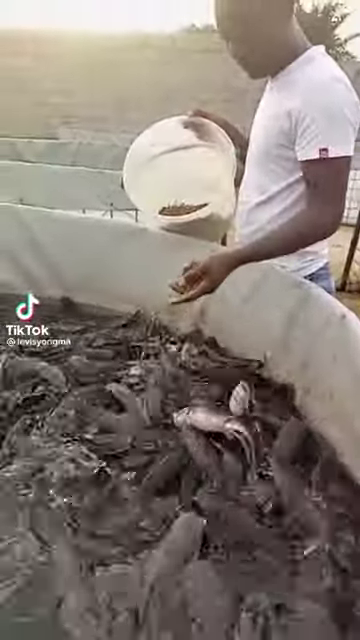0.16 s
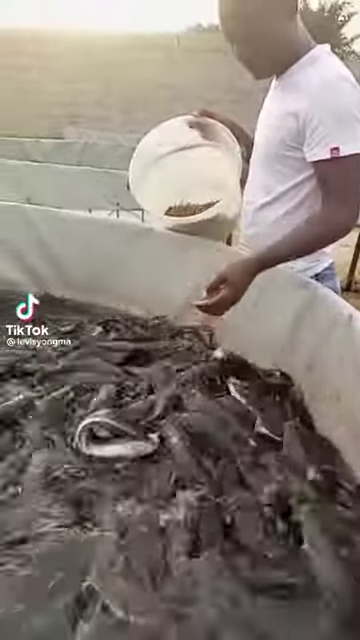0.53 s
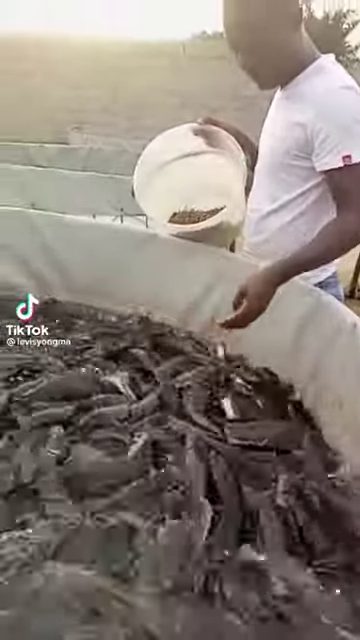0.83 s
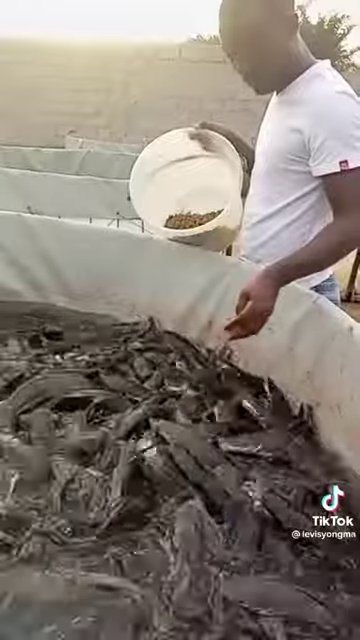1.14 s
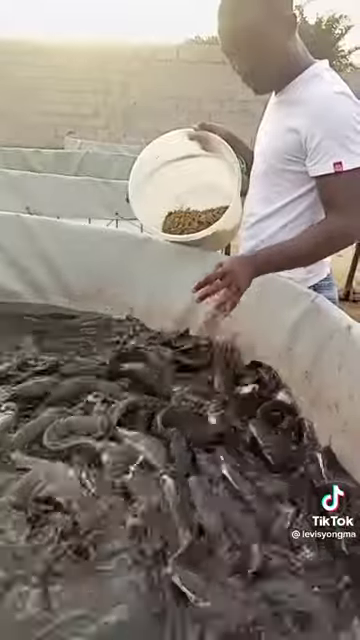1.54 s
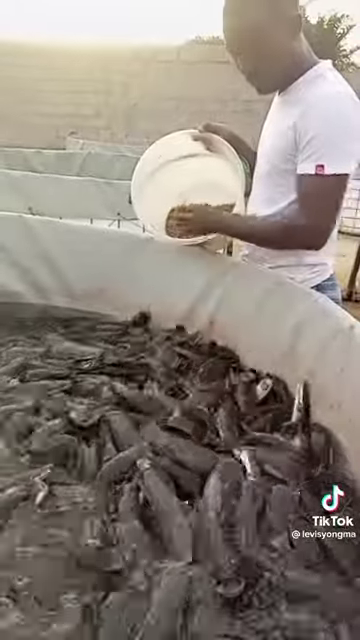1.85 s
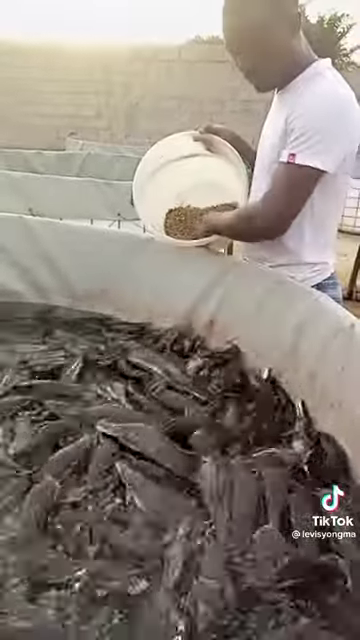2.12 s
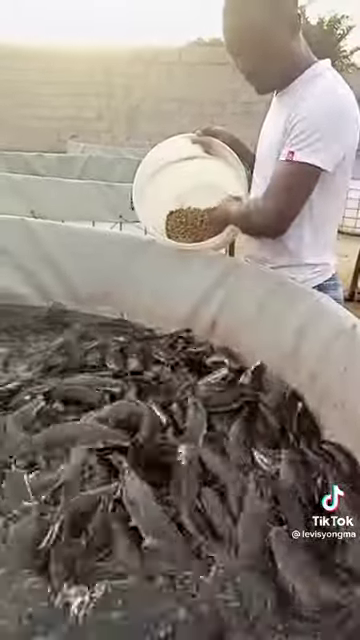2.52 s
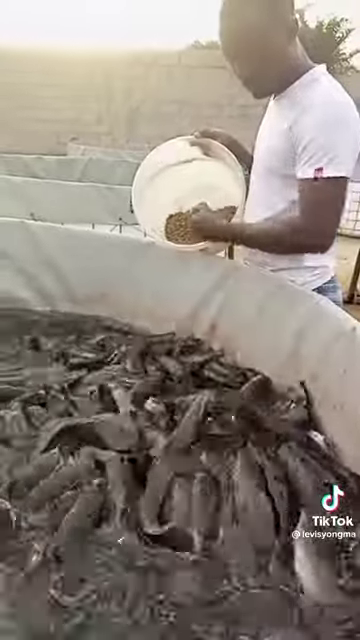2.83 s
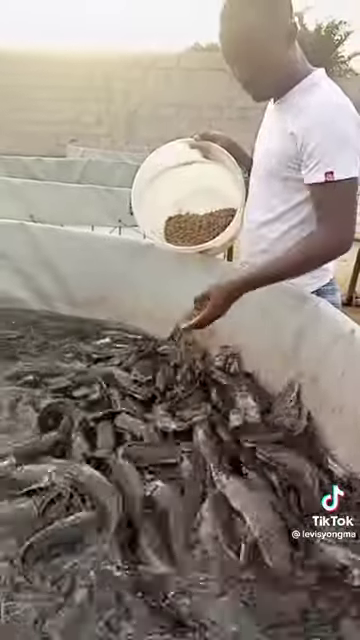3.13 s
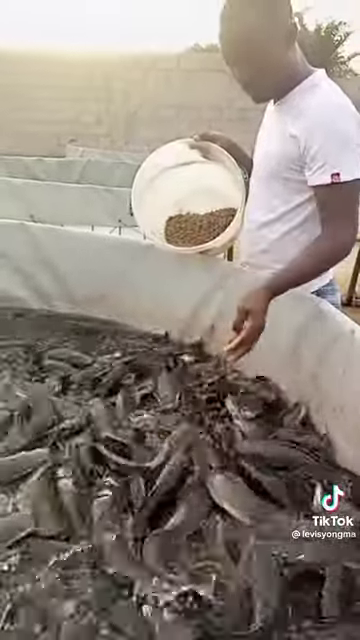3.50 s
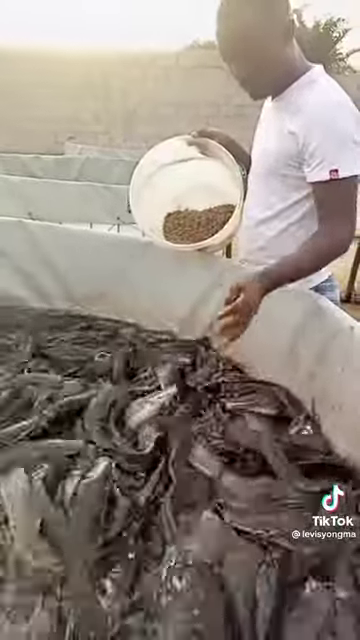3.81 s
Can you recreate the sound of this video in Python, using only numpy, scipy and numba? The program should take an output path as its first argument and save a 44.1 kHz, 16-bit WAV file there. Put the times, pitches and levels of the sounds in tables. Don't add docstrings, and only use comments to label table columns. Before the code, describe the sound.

Catfish thrashing at the surface of a packed tank, water boiling, slapping, splashing and bubbling

```python
import sys
import numpy as np
from scipy import signal
from scipy.fft import rfft, irfft
from scipy.io import wavfile
from scipy.ndimage import uniform_filter1d
from numba import njit

SR = 44100
rng = np.random.default_rng(int(sys.argv[2]) if len(sys.argv) > 2 else 0)


def transcribe(u):
    v = np.clip(np.atleast_2d(u).T, -1, 1)
    q = np.round(v * 32767).astype(np.int16)
    wavfile.write(sys.argv[1], SR, q)


def natural_amplitude(level_db):
    exponent = np.asarray(level_db, float) / 20
    return 10 ** exponent


N = 174636

# frequency_hz, level_db
MIC_TONE = [(3600, -9.5), (4300, -3), (7000, 5), (8000, -0.5), (10500, 4), (11300, -4.5), (13700, -7.5),
            (15300, 4.5)]
SWELL = 0.45
GLIDE = 1.004


def table_db(table, hz):
    table_hz, db = np.array(table, float).T
    return np.interp(np.log(hz), np.log(table_hz), db)


def water_db(hz):
    # frequency_hz, level_db (per Hz)
    surface = [(60, -22.5), (400, -7.5), (800, -1.5), (1080, -5.5), (1530, 1.5), (1800, -1.5), (2750, -9.5),
               (3500, -20)]
    octaves_above = np.log2(np.maximum(hz / surface[-1][0], 1))
    return table_db(surface, hz) - 9 * octaves_above


def unit(x):
    return x / np.sqrt(np.mean(x ** 2))


def walk(rate_hz):
    hold = int(SR / rate_hz)
    steps = np.repeat(rng.standard_normal(400), hold)[:N]
    return unit(uniform_filter1d(uniform_filter1d(steps, hold), hold))


@njit
def ring(n, start_s, hz, cycles, size):
    y = np.zeros(n)
    for k in range(len(start_s)):
        first = int(start_s[k] * SR)
        decay = cycles[k] * SR / hz[k]
        fade = np.exp(-1 / decay)
        swell = np.exp(-1 / (SWELL * decay))
        bend = GLIDE ** (1 / decay)
        level, unswollen, phase = size[k], 1., 0.
        step = 2 * np.pi * hz[k] / SR
        for i in range(max(first, 0), min(first + int(4.5 * decay), n)):
            y[i] += level * (1 - unswollen) ** 2 * np.sin(phase)
            level *= fade
            unswollen *= swell
            phase += step
            step = min(step * bend, 2.8)
    return y


def lasting(events, length_s):
    return [tuple(row) + (length_s,) for row in events]


def bursts(events, count, spread, cycles, lead_db, swarm_db, weigh=0.):
    start_s, peak_db, centre_hz, length_s = (c[:, None] for c in np.array(events, float).T)
    u = rng.random((len(start_s), 4, count))
    detune = np.clip(rng.standard_normal((len(start_s), count)), -2, 2)
    follower = np.arange(count) > 0
    late = (1.6 * u[:, 0] * (.3 + u[:, 3]) - .22) * follower
    pitch = np.clip(centre_hz * np.exp(spread * detune * follower), 60, 15600)
    level = peak_db - table_db(MIC_TONE, centre_hz)
    level = level + weigh * (water_db(pitch) - water_db(centre_hz))
    scatter_db = -2.2 * np.log(u[:, 1])
    level = level + np.where(follower, swarm_db + scatter_db, lead_db)
    turns = cycles * (.5 + u[:, 2]) * (pitch / 1000) ** .6
    start = start_s + length_s * late
    return ring(N, start.ravel(), pitch.ravel(), turns.ravel(), natural_amplitude(level).ravel())


def boil(fine_db):
    u = rng.random((22000, 4))
    start = u[:, 0] * N / SR
    hz = 60 * 260. ** np.sqrt(u[:, 1])
    cycles = 5.5 * (np.minimum(hz, 6000) / 1000) ** .9 * (.4 + 1.2 * u[:, 2])
    at = (start * SR).astype(int)
    flurries = np.array([walk(16) for _ in range(16)])
    flurry = flurries[(np.log(hz) * 5).astype(int) % 16, at]
    surge = walk(14)
    share = hz ** 2 / cycles / np.log(hz / 55)
    fine = np.clip(np.log2(hz / 2000), 0, 1)
    even = np.clip(np.log2(hz / 5500) * 1.5, 0, .75)
    variation_db = -2.4 * np.log(u[:, 3]) + 3.03 * flurry
    db = water_db(hz) + (1 - even) * variation_db + 2.2 * surge[at] + fine * fine_db[at]
    bubbles = ring(N, start, hz, cycles, natural_amplitude(db) * np.sqrt(share))

    f = np.maximum(np.fft.rfftfreq(N, 1 / SR), 20)
    tilt_db = 2 * np.log2(np.maximum(f / 4000, 1))
    hiss = irfft(rfft(rng.standard_normal(N)) * natural_amplitude(water_db(f) + tilt_db), N)
    return natural_amplitude(-3) * unit(bubbles) + natural_amplitude(-6 + 1.8 * surge) * unit(hiss)


def crackle(fine_db):
    u = rng.random((1100, 3))
    start = u[:, 0] * N / SR
    hz = 3500 * 4 ** u[:, 2]
    db = fine_db[(start * SR).astype(int)] - 3.3 * np.log(u[:, 1])
    clicks = ring(N, start, hz, np.full(len(u), 2.5), natural_amplitude(db))
    return natural_amplitude(-28) * unit(clicks)


def shoal():
    # start_s, level_db, fine_spray_db
    churn = [(0, -33, 1.5), (.18, -34, 3), (.48, -34, 8.5), (.58, -34.5, 4), (.87, -37.5, 3),
             (.93, -30, -4), (1.04, -35, -0.5), (1.3, -34, -1), (1.75, -40, 3.5), (2.18, -36, 4.5),
             (2.3, -33.5, 3.5), (2.52, -40, 4.5), (2.6, -37, 3.5), (3.2, -39.5, 7.5), (3.58, -37, 12.5),
             (3.67, -31, 4.5), (3.78, -35, 3), (3.96, -40, 11)]
    start_s, level_db, fine_db = np.array(churn, float).T
    t = np.arange(N) / SR
    fine_db = np.interp(t, start_s, fine_db)
    return natural_amplitude(np.interp(t, start_s, level_db)) * (boil(fine_db) + crackle(fine_db))


def gurgles():
    # start_s, peak_db, pitch_hz, length_s
    streams = [(.02, -30, 803, 0.068), (.13, -34.5, 2600, 0.036), (.27, -35, 767, 0.074),
               (.4, -35, 623, .05), (.93, -35.5, 1064, 0.055), (.95, -38.5, 633, .05),
               (2.24, -33.5, 541, 0.062), (2.275, -39, 8320, 0.012), (2.466, -36, 10150, 0.013),
               (2.345, -43.5, 3350, 0.02), (2.51, -36.5, 883, 0.021), (2.62, -35, 893, 0.032),
               (3.605, -40.5, 734, 0.033), (.002, -31, 355.4, .025), (.045, -38.5, 365, 0.052),
               (.06, -36.5, 1150, 0.037), (.155, -39.5, 758, .02), (.485, -39.5, 803, .03),
               (.614, -40.5, 1144, .05), (.765, -34.5, 863, .03), (1.02, -45.5, 551, 0.037),
               (1.545, -34.5, 1402, 0.022), (3.115, -35.5, 1490, 0.027), (3.525, -41, 883, 0.024),
               (3.557, -49, 330, 0.041), (3.655, -34, 717, 0.039), (3.69, -40, 930, 0.036),
               (3.71, -40, 712, 0.038), (3.8, -44.5, 324, 0.047), (.21, -41, 3400, 0.027),
               (.27, -43.5, 3990, 0.038), (.44, -44.5, 3360, 0.034), (.615, -48, 4080, .03),
               (.785, -46.5, 4020, 0.042), (.915, -48, 6100, 0.02), (.94, -43.5, 4870, .025),
               (2.2, -42, 2120, 0.035), (2.3, -38, 918, 0.032), (2.868, -44, 6020, .02),
               (3.305, -42.5, 2820, 0.048)]
    return bursts(streams, count=30, spread=0.05, cycles=6.5, lead_db=1, swarm_db=-5)


def sprays():
    # start_s, peak_db, centre_hz, length_s
    throws = [(0.119, -26.5, 7220, 0.011), (0.217, -32.5, 3520, 0.015), (0.2587, -30.5, 4890, 0.0095),
              (0.32, -30.5, 5840, 0.012), (0.427, -34, 3850, 0.026), (0.503, -31.5, 6900, 0.0048),
              (0.7462, -27.5, 6570, 0.017), (0.89, -30.5, 7570, 0.022), (0.953, -35, 5150, 0.011),
              (1.16, -30.5, 4580, 0.012), (1.23, -32, 3990, 0.012), (1.474, -34, 3350, 0.013),
              (1.554, -34, 4510, 0.0075), (1.8144, -29, 4160, 0.0072), (2.072, -29.5, 3290, 0.022),
              (2.277, -27.5, 3346, 0.011), (2.311, -30, 6240, 0.012), (2.394, -29.5, 5620, 0.017),
              (2.4597, -23.5, 3800, 0.016), (2.4816, -17, 3886, 0.019), (3.081, -34, 3430, 0.021),
              (3.259, -28.5, 4280, 0.008), (3.3067, -24, 5090, 0.02), (3.396, -31, 4710, 0.013),
              (3.588, -37, 10100, 0.013), (3.675, -23.5, 6510, 0.024), (3.72, -23, 6230, 0.019),
              (3.809, -27.5, 5900, 0.01), (.005, -35.5, 4280, 0.021), (.071, -45, 4780, 0.017),
              (.357, -42, 4930, 0.033), (.914, -28, 6010, 0.028), (1.005, -32.5, 5800, 0.0076),
              (2.29, -21.5, 5220, 0.023), (2.335, -34, 5300, 0.029), (3.004, -31.5, 7130, 0.0062),
              (3.174, -34.5, 4260, 0.014), (3.341, -26.5, 6250, .015)]
    return bursts(throws, count=150, spread=0.38, cycles=3.43, lead_db=0.5, swarm_db=-22.0, weigh=0.47)


def flicks():
    # start_s, peak_db, pitch_hz
    pockets = [(0.0642, -24.5, 1506), (0.1199, -14.5, 1674), (0.356, -26.5, 1944), (0.426, -32, 1420),
               (0.4539, -24, 1533), (0.638, -24.5, 1226), (0.756, -27, 1503), (1.0093, -22, 1397),
               (1.2027, -39, 1500), (1.2336, -34, 1475), (1.5367, -27.5, 1353), (2.066, -30.5, 2780),
               (2.2836, -30, 1210), (2.4437, -21, 1244), (2.4891, -23.5, 1460), (2.6803, -32, 2520),
               (2.9457, -28, 1485), (3.0819, -26, 1495), (3.1097, -29, 1490), (3.2976, -30, 1468),
               (3.5534, -23.5, 1890), (3.6574, -26.5, 1566), (3.739, -28.5, 1440), (3.7972, -25, 2200),
               (.206, -31, 2370), (.43, -36, 2380), (2.02, -32, 1336), (2.738, -32, 1560),
               (2.805, -31.5, 1630), (3.219, -32.5, 1530)]
    return bursts(lasting(pockets, 0.011), count=16, spread=0.138, cycles=6.2, lead_db=0.5, swarm_db=-16)


def drops():
    # start_s, peak_db
    strikes = [(0.0712, -47), (0.1246, -46), (0.2069, -41), (0.2606, -31.5), (0.3012, -43), (0.317, -36.5),
               (0.3555, -39.5), (0.4226, -39), (0.597, -38), (0.8864, -40), (0.998, -43), (1.3239, -41),
               (1.5504, -43), (1.7983, -41), (1.907, -37), (1.957, -40.5), (2.279, -33), (2.394, -51),
               (2.468, -32), (2.4887, -38), (2.626, -40), (2.803, -38), (3.0048, -44), (3.0824, -36.5),
               (3.2984, -43), (3.3368, -40), (3.5997, -44), (3.6505, -41), (3.6706, -31), (3.714, -30),
               (3.8147, -41), (3.9035, -38)]
    start_s, peak_db = np.array(strikes, float).T
    hits = np.zeros(N)
    np.add.at(hits, (start_s * SR).astype(int), natural_amplitude(peak_db - 7))
    t = np.arange(1500) / SR / 0.0027
    puff = 2 * (np.exp(-t) - np.exp(-4 * t))
    fade = np.convolve(hits, puff)[:N]
    band = signal.butter(1, [2200, 7800], "band", fs=SR, output="sos")
    bright = signal.sosfilt(band, rng.standard_normal(N))
    return fade * unit(bright)


def gulps():
    # start_s, peak_db, pitch_hz
    pockets = [(0.114, -34, 880), (0.302, -27.5, 764), (0.356, -24, 803), (0.367, -25.5, 650),
               (0.436, -26.5, 668), (0.925, -31, 750), (1.008, -29, 562), (1.162, -36, 930),
               (1.279, -37, 842), (1.79, -32.5, 935), (1.829, -37.5, 1010), (1.978, -35.5, 702),
               (2.07, -33.5, 500), (2.276, -26, 504), (2.49, -29.5, 510), (2.831, -31.5, 820),
               (3.765, -51, 490)]
    return bursts(lasting(pockets, 0.02), count=16, spread=0.12, cycles=3.03, lead_db=3.5, swarm_db=-4.5)


def plunges():
    # start_s, peak_db, pitch_hz
    cavities = [(.131, -39.5, 256), (.374, -48, 210), (.66, -39.5, 318), (.79, -38.5, 445), (.95, -43, 134),
                (1.15, -49.5, 131), (1.885, -45.5, 86), (1.91, -44, 255), (1.98, -42, 268),
                (2.076, -41, 234), (2.11, -55, 86), (2.28, -44, 222), (2.464, -24, 366), (2.51, -44.5, 157),
                (2.85, -42.5, 353), (3.806, -46.5, 130), (.46, -48, 110), (2.63, -53, 133),
                (3.09, -66, 90.5), (3.92, -51, 119)]
    return bursts(lasting(cavities, 0.025), count=8, spread=0.091, cycles=2.63, lead_db=7, swarm_db=-0.5)


def ticks():
    # start_s, peak_db, centre_hz
    close = [(0.2069, -37, 10000), (0.2583, -34.5, 14900), (0.3551, -46, 14100), (0.3925, -42, 15200),
             (0.4823, -48, 15300), (0.9732, -38, 15900), (1.905, -34, 10500), (3.2984, -34, 15700),
             (3.6006, -30.5, 10770), (3.6526, -36, 15300), (3.672, -27, 15200)]
    return bursts(lasting(close, .004), count=24, spread=.3, cycles=1.5, lead_db=-2, swarm_db=-5, weigh=.3)


def tank(x):
    t = np.arange(6000) / SR
    decay = natural_amplitude(-60 * t / 0.11)
    tail = rng.standard_normal(len(t)) * decay * (t > .002)
    tail = tail / np.sqrt(np.sum(tail ** 2))
    return x + natural_amplitude(-8.5) * signal.fftconvolve(x, tail)[:N]


def scene():
    fish = gurgles() + sprays() + flicks() + gulps() + plunges()
    water = shoal() + drops() + ticks()
    return tank(water + fish)[None]


def band_limit(x):
    return signal.sosfilt(signal.butter(12, 16340, fs=SR, output="sos"), x)


def record(dry):
    f = np.maximum(np.fft.rfftfreq(N, 1 / SR), 5)
    low_cut = 1 / np.sqrt(1 + (61 / f) ** 6)
    colour = natural_amplitude(table_db(MIC_TONE, f)) * low_cut * (f < 15800)
    return band_limit(irfft(rfft(dry) * colour, N))


dry = scene()
out = record(dry)
transcribe(out)
```